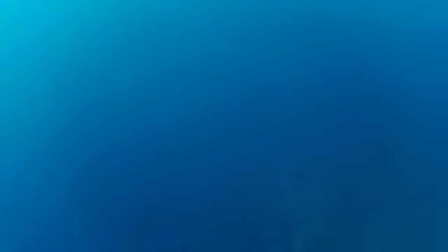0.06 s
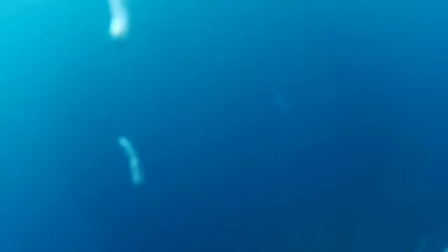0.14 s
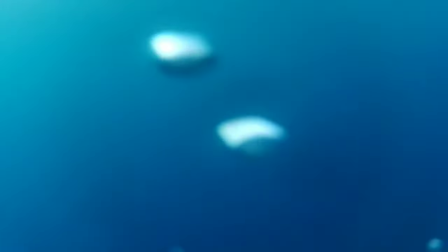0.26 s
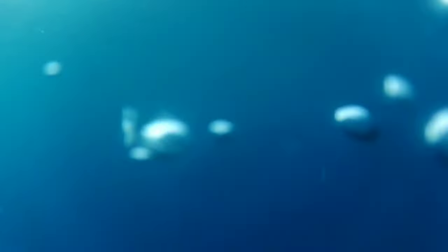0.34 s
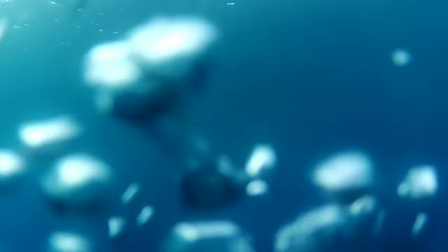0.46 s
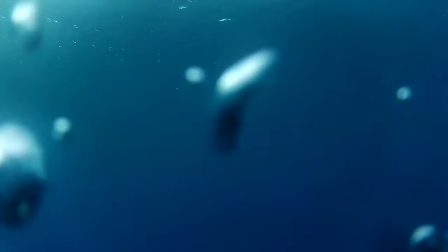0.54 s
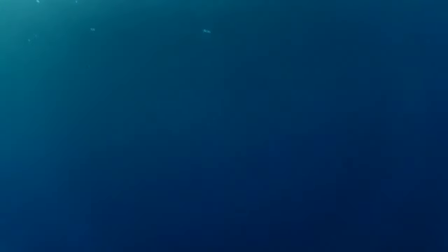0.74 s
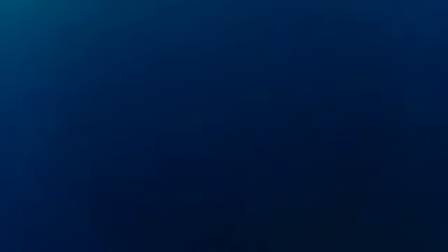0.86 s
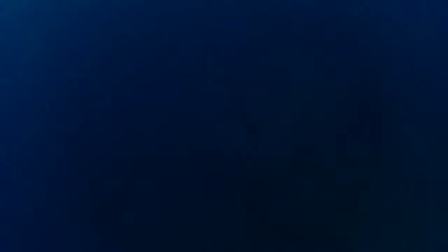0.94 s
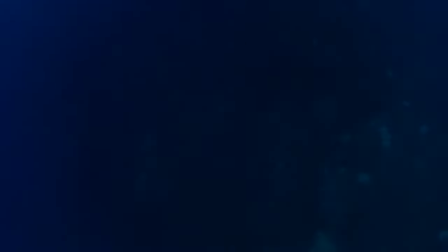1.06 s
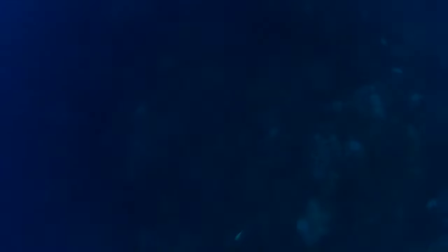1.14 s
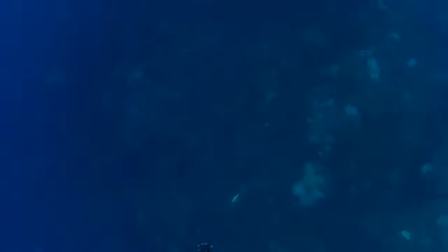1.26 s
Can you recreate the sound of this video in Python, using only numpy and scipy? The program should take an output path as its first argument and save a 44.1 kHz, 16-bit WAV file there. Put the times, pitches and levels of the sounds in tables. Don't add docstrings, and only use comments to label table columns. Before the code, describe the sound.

Bubbles burble past a submerged camera in a thick rush, thin out, then a knock and last gurgle

```python
import sys
import numpy as np
from scipy import signal
from scipy.fft import rfft, irfft
from scipy.io import wavfile

SR = 44100
rng = np.random.default_rng(int(sys.argv[2]) if len(sys.argv) > 2 else 0)


def pcm_store(signal):
    levels = np.round(np.clip(np.atleast_2d(signal), -1, 1) * 32767)
    wavfile.write(sys.argv[1], SR, levels.astype(np.int16).T)


def natural_amplitude(level_db):
    exponent = np.asarray(level_db, float) / 20
    return 10 ** exponent


N = 57330


def rms_one(x):
    return x / np.sqrt(np.mean(x ** 2) + 1e-20)


def in_time(rows):
    s, *columns = np.transpose(rows)
    return [np.interp(np.arange(N) / SR, s, column) for column in columns]


def at_hz(points, hz):
    curve_hz, curve_db = np.transpose(points)
    return np.interp(np.log(hz), np.log(curve_hz), curve_db)


def filtered(x, order, hz, kind="low"):
    return signal.sosfilt(signal.butter(order, hz, kind, fs=SR, output="sos"), x)


def ring(clicks, hz, t60):
    r, w = natural_amplitude(-60 / (t60 * SR)), 2 * np.pi * hz / SR
    return signal.lfilter([0, np.sin(w)], [1, -2 * r * np.cos(w), r * r], clicks + 1e-18)


def add(out, s, db, hz, t60, rise):
    t60 = max(t60, 0.002)
    t, start = np.arange(int(t60 * SR)) / SR, int(s * SR)
    shape = (1 - np.exp(-(t / rise) ** 2)) * natural_amplitude(-60 * t / t60)
    wave = shape / shape.max() * np.sin(2 * np.pi * hz * t)
    out[start:start + len(t)] += natural_amplitude(db) * wave[:max(N - start, 0)]


def clicks_at(events):
    out = np.zeros(N)
    for s, db in events:
        out[int(s * SR)] = natural_amplitude(db)
    return out


def grains(per_s, spread_db):
    sizes = natural_amplitude(spread_db * np.minimum(rng.exponential(1, N), 4)) * rng.choice([-1, 1], N)
    return sizes * (rng.random(N) < per_s / SR)


def clumps():
    settle = 4000
    return rms_one(filtered(rng.standard_normal(N + settle), 2, 48)[settle:])


def band(hz, width_hz):
    slow = filtered(rng.standard_normal((2, N)), 4, width_hz / 2)
    phase = 2 * np.pi * np.cumsum(hz * np.ones(N)) / SR
    return rms_one(slow[0] * np.cos(phase) + slow[1] * np.sin(phase))


def hiss():
    # f/Hz, level/dB
    colour = [(30, -13), (400, -9), (1500, 2.5), (5500, -12), (15500, -11.5)]
    hz = np.maximum(np.arange(N // 2 + 1) * SR / N, 1)
    spectrum = rfft(rng.standard_normal(N)) * natural_amplitude(at_hz(colour, hz))
    return natural_amplitude(-80.5) * rms_one(irfft(spectrum, N))


def far_water():
    # t/s, sliding band f/Hz, its level/dB, upper band level/dB
    moving = [(0, 3713, -58.5, -69), (.06, 3500, -80.5, -107), (.4, 3656, -77, -84), (.62, 3556, -76, -102),
              (.8, 3050, -72.5, -94), (.9, 2910, -68.5, -82), (1.1, 2950, -98.5, -84),
              (1.3, 3160, -79.5, -98)]
    # f/Hz, width/Hz, level/dB
    steady = [(1100, 440, -78), (1728, 490, -72.5)]
    sliding_hz, sliding_db, upper_db = in_time(moving)
    rush = sum(natural_amplitude(db) * band(hz, width_hz) for hz, width_hz, db in steady)
    rush = rush + natural_amplitude(sliding_db) * band(sliding_hz, 540)
    return rush + natural_amplitude(upper_db) * band(4615, 390)


def swarm(level_db):
    # f/Hz, level/dB
    pitch_levels = [(350, -39), (600, 0.5), (1680, 3), (2910, -13), (3900, -24.5), (5000, -32.5),
                    (6500, -68), (11000, -120)]
    clicks, dealt = grains(3000, 3), rng.integers(0, 30, N)
    crowd = np.zeros(N)
    for k, hz in enumerate(np.geomspace(650, 4600, 30)):
        rung = ring(ring(clicks * (dealt == k), hz, 74 / hz), hz, 3.6 / hz)
        crowd += natural_amplitude(at_hz(pitch_levels, hz)) * hz ** 2 * rung
    fine, dealt = grains(1100, 1.3), rng.integers(0, 8, N)
    fizz = np.zeros(N)
    for k, hz in enumerate(np.geomspace(4800, 9500, 8)):
        fizz += natural_amplitude(-1.5 * k) * ring(ring(fine * (dealt == k), hz, 0.0029), hz, 0.0022)
    clumped = natural_amplitude(level_db + 4 * clumps())
    return clumped * (natural_amplitude(-1.5) * rms_one(crowd) + natural_amplitude(-35) * rms_one(fizz))


def cavity(level_db):
    cavity_hz, free_start_s, free_t60_s = 505, 0.322, 0.25
    hum = ring(ring(grains(270, 2.3), cavity_hz, 0.024), cavity_hz, 0.0047)
    t = np.maximum(np.arange(N) / SR - free_start_s, 0)
    sinking = 2 * np.pi * cavity_hz * 1.09 * t * (1 - 0.0918 * t / free_t60_s)
    swell = 1 - np.exp(-(t / 0.0072) ** 2)
    free = natural_amplitude(-29 - 60 * t / free_t60_s) * swell * np.sin(sinking + 0.5 * clumps())
    return natural_amplitude(level_db - 0.5) * rms_one(hum) + free * natural_amplitude(3.5 * clumps())


def bubbles():
    # t/s, peak level/dB, f/Hz, length/s
    clear = [(0.0138, -57, 843, 0.06), (0.1088, -40.5, 835, 0.01), (0.1658, -41, 580, 0.0089),
             (0.2249, -37, 573, 0.0086), (0.2425, -38, 562.4, 0.055), (0.2679, -23.0, 701, 0.017),
             (0.2865, -19.5, 603, 0.013), (0.2953, -24.5, 566, 0.012), (0.3049, -24.5, 555.4, 0.034),
             (0.3435, -42.7, 844, 0.037), (0.3706, -38, 834, 0.024), (0.4204, -45, 497, 0.053),
             (0.4206, -42.5, 790, 0.009), (0.4407, -43, 800, 0.02), (0.502, -45, 930, 0.024),
             (0.6112, -35, 650, 0.0045), (0.7127, -42, 940, 0.018), (0.8757, -36.5, 490, 0.0046),
             (0.9177, -41, 456, 0.0055), (0.9288, -54, 970, 0.021), (0.9668, -46.5, 510, 0.016),
             (1.0239, -35.5, 573, 0.02), (1.0908, -50.5, 802, 0.028),
             (0.03, -54, 1257, 0.018), (0.1545, -38.9, 1300, 0.015), (0.193, -47.5, 1303, 0.016),
              (0.2445, -34.7, 1450, 0.0042), (0.2827, -28.8, 1084, 0.005), (0.2945, -30.5, 1383, 0.02),
              (0.328, -40.5, 1314, 0.02), (0.344, -36, 1326, 0.017), (0.3677, -45, 1268, 0.051),
              (0.398, -44.5, 1350, 0.013), (0.3987, -49, 1185, 0.032), (0.4125, -41.5, 1530, 0.005),
              (0.4204, -34, 1485, 0.015), (0.433, -35.5, 1530, 0.0028), (0.4457, -62, 1504, 0.011),
              (0.469, -47.5, 1026, 0.019), (0.494, -44, 1313, 0.024), (0.5146, -40.5, 1144, 0.0086),
              (0.5357, -42, 1121, 0.0027), (0.549, -41.1, 1383, 0.017), (0.5756, -50, 1070, 0.032),
              (0.588, -41, 1400, 0.018), (0.6167, -32.5, 1186, 0.0069), (0.6631, -54, 1600, 0.013),
              (0.6639, -51.5, 1230, 0.037), (0.7, -48, 1216, 0.013), (0.854, -51.6, 1485, 0.017),
              (0.968, -51, 1390, 0.027), (1.089, -42, 1473, 0.0053), (1.1068, -40.5, 1180, 0.0035),
             (0.0414, -43, 1883, 0.0095), (0.0947, -39.5, 1842, 0.017), (0.109, -40.5, 1776, 0.037),
              (0.1195, -52, 1700, 0.016), (0.1222, -43, 2100, 0.015), (0.1277, -46, 1880, 0.009),
              (0.146, -51, 1944, 0.042), (0.155, -42, 1640, 0.0044), (0.192, -42.5, 1990, 0.011),
              (0.203, -38, 2600, 0.0022), (0.2134, -37, 2090, 0.0054), (0.3104, -28.5, 1853, 0.017),
              (0.3225, -35, 1910, 0.014), (0.3523, -38, 1630, 0.015), (0.3719, -40, 1690, 0.0071),
              (0.4231, -32.5, 1750, 0.0018), (0.468, -42.5, 1800, 0.005), (0.4721, -44, 2360, 0.015),
              (0.4728, -37.5, 1660, 0.019), (0.4853, -36, 1818, 0.006), (0.4961, -37, 1680, 0.0076),
              (0.5016, -43.5, 1850, 0.012), (0.5123, -37.5, 1608, 0.018), (0.5268, -46.5, 1810, 0.037),
              (0.5275, -33, 1630, 0.0065), (0.5483, -46.6, 1630, 0.011), (0.5486, -44, 2230, 0.0078),
              (0.559, -50, 1800, 0.012), (0.5872, -50, 1870, 0.014), (0.5877, -46, 2350, 0.0089),
              (0.6131, -38.5, 1820, 0.013), (0.6212, -47, 1800, 0.0079), (0.631, -43, 1650, 0.013),
              (0.6543, -46.4, 1743, 0.0085), (0.6742, -42.0, 2113, 0.017), (0.712, -38, 1910, 0.0055),
              (0.7319, -51.5, 2180, 0.022), (0.7326, -47.5, 1776, 0.023), (0.7337, -47.5, 1620, 0.012),
              (0.818, -60, 1577, 0.029), (1.0126, -39, 1569, 0.041), (1.0316, -35.5, 2010, 0.01),
              (1.0356, -29.5, 1660, 0.0086), (1.0945, -50, 1760, 0.0074), (1.1056, -53, 1886, 0.027),
              (1.124, -47, 1830, 0.0061), (1.1226, -49, 2036, 0.015), (1.148, -61.5, 1910, 0.027),
              (1.1674, -65, 1820, 0.081),
             (0.066, -55.5, 815, 0.016), (0.094, -50, 785, 0.023), (0.159, -39, 410, 0.0068),
              (0.192, -49.5, 568, 0.013), (0.752, -47.5, 522, 0.011), (0.888, -45.5, 394, 0.0062),
              (1.0085, -33.5, 493, 0.0089), (1.0258, -36, 2080, 0.0041), (1.042, -37.5, 596, 0.015),
              (1.06, -37, 500, 0.0088), (1.0824, -46, 713, 0.0087)]
    # t/s, peak level/dB, f/Hz
    small = [(0.019, -56.5, 4300), (0.042, -46, 3525), (0.193, -56, 3760), (0.2075, -41.5, 2760),
             (0.2811, -42, 3400), (0.4513, -45, 2740), (0.5358, -53, 3700), (0.5497, -46, 3970),
             (1.041, -47, 3530), (1.044, -45.5, 3124), (0.3603, -61, 4680), (0.5135, -56.5, 4140),
             (0.5648, -52, 3670), (1.0888, -50.5, 3560)]
    small_s = 0.0086
    skew, sag = 0.34, 0.015
    out = np.zeros(N + SR)
    for s, db, hz, length in clear + [(*row, small_s) for row in small]:
        start, count = int(s * SR), int(length * SR)
        u = np.arange(count) / count
        swell = np.sin(np.pi * u ** skew) ** 2
        tone = np.sin(2 * np.pi * hz * length * u * (1 + sag * (1 - u)))
        out[start:start + count] += natural_amplitude(db) * swell * tone
    wobble = rms_one(filtered(rng.standard_normal(N), 2, 300))
    return out[:N] * natural_amplitude(1.5 * wobble)


def ticks():
    # t/s, peak level/dB, f/Hz
    bursts = [(0.021, -56.5, 6340), (0.0423, -41, 6940), (0.192, -54.5, 6650), (0.2132, -44, 6870),
              (0.294, -54, 6650), (0.316, -59, 7700), (0.269, -67, 6500), (0.3, -58, 5800),
              (0.337, -61, 5740), (0.577, -63, 7500), (0.6975, -72, 6300), (0.418, -70.5, 8400),
              (0.4582, -50.5, 7620), (0.4661, -51, 7170), (0.5094, -60, 9060), (0.552, -62.5, 6900),
              (0.7129, -57.5, 7080), (0.9297, -60.5, 6700), (1.0157, -69, 6730)]
    # t/s, peak level/dB
    wall_snaps = [
        (0.466, -40),
        (0.55, -27.5),
        (0.7124, -33),
        (0.93, -39),
        (1.017, -52),
        (1.0885, -45),
    ]
    # t/s, peak level/dB
    thin_cracks = [
        (0.1487, -48),
        (0.1556, -46.5),
        (0.435, -59),
        (0.468, -47),
        (1.0147, -59),
        (0.509, -70),
    ]
    out, thin = np.zeros(N), np.zeros(N)
    for s, db, hz in bursts:
        add(out, s, db, hz, t60=0.0058, rise=0.0004)
        thin[int(s * SR) + 20] = natural_amplitude(db + 2.5)
    out += 2 * filtered(thin, 3, [4366, 8000], "band")
    out += 4 * filtered(clicks_at(wall_snaps), 3, [1220, 3130], "band")
    return out + 2 * filtered(clicks_at(thin_cracks), 3, [5800, 12000], "band")


def water_pushes(stir_db):
    # t/s, peak level/dB
    shoves = [
        (0.164, -66),
        (0.208, -65.5),
        (0.272, -63.5),
        (0.44, -70.5),
        (0.813, -67),
    ]
    puffs = clicks_at(shoves) * natural_amplitude(-1.5)
    r = natural_amplitude(-60 / (0.055 * SR))
    fade = signal.lfilter([1], [1, -r], puffs)
    soft_start = signal.lfilter([1], [1, -r ** 6], puffs)
    rumble = rms_one(filtered(rng.standard_normal(N), 3, 210))
    return rumble * (fade - soft_start + natural_amplitude(0.5 * stir_db - 63.5))


def knock():
    # f/Hz, level/dB, t60/s
    modes = [
        (130, -24, 0.023),
        (272, -24, 0.028),
        (631, -4, 0.029),
        (860, 2.5, 0.0087),
        (1337, -18, 0.012),
    ]
    out = np.zeros(N)
    for hz, db, t60 in modes:
        add(out, 1.0315, db - 18, hz, t60, rise=0.36 / hz)
    return out


def scene():
    # t/s, swarm level/dB, cavity level/dB
    stir = [(0, -51, -69), (.06, -103, -69.5), (.12, -56, -65), (.185, -58, -63.5), (.25, -46.5, -45),
            (.33, -45.5, -49.5), (.43, -49, -52.5), (.62, -47.5, -53.5), (.645, -59, -64.5),
            (.75, -58, -58.5), (.78, -71, -68.5), (.95, -68.5, -64), (1.0, -60, -65.5), (1.035, -45, -35.5),
            (1.06, -56.5, -60), (1.125, -58.5, -66.5), (1.14, -66.5, -76), (1.3, -89.5, -99)]
    swarm_db, cavity_db = in_time(stir)
    water = far_water() + swarm(swarm_db) + cavity(cavity_db) + bubbles()
    water = filtered(water, 6, 402, "high")
    blows = filtered(water_pushes(swarm_db) + knock(), 2, 95, "high")
    return (hiss() + water + ticks() + blows)[None]


def top_cut(x):
    return signal.sosfilt(signal.butter(12, 15670, fs=SR, output="sos"), x)


def record(dry):
    return top_cut(dry)


dry = scene()
out = record(dry)
pcm_store(out)
```